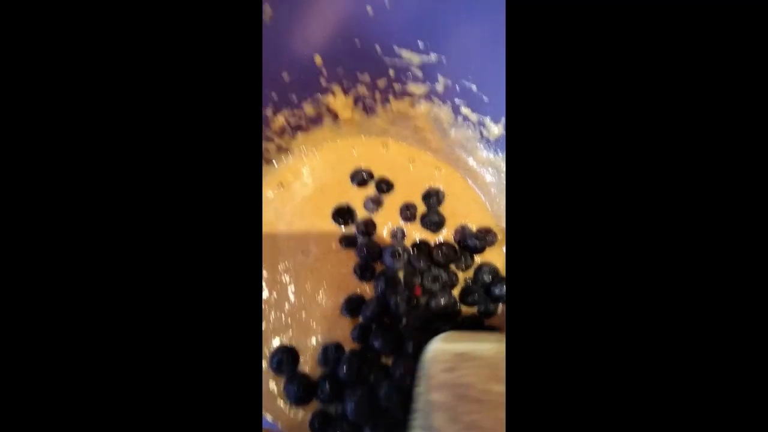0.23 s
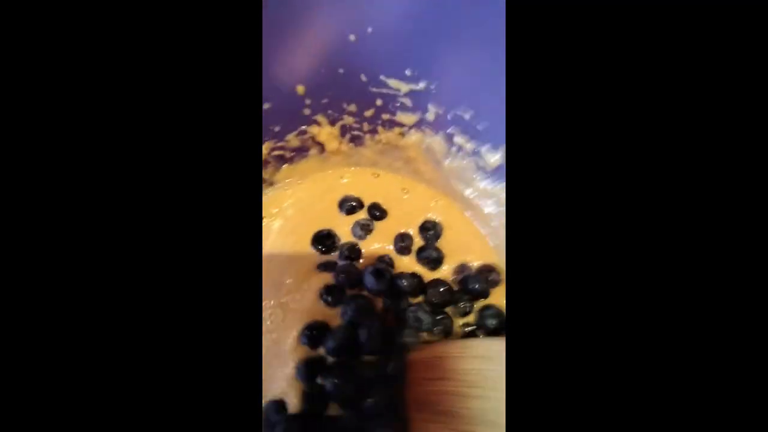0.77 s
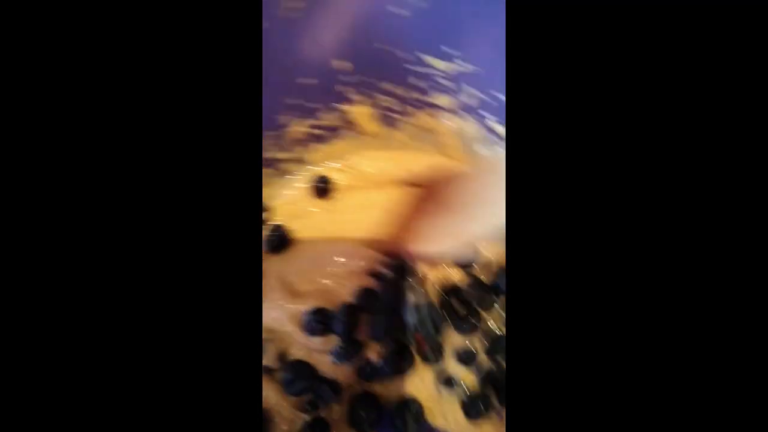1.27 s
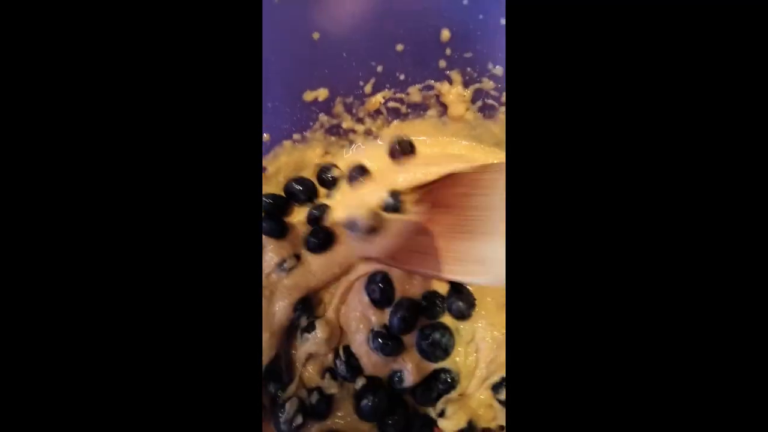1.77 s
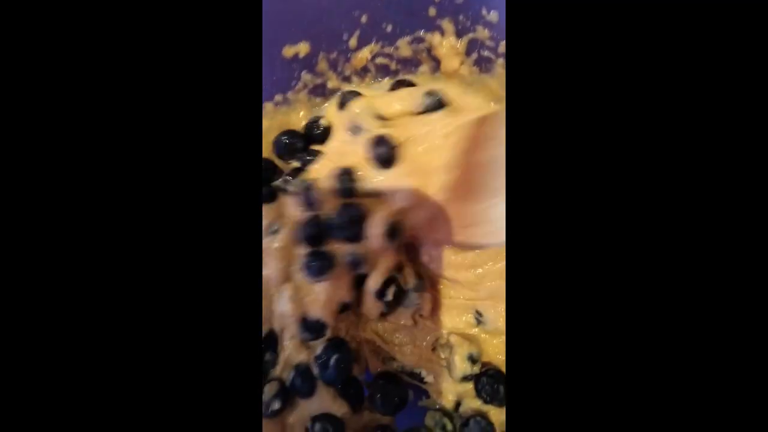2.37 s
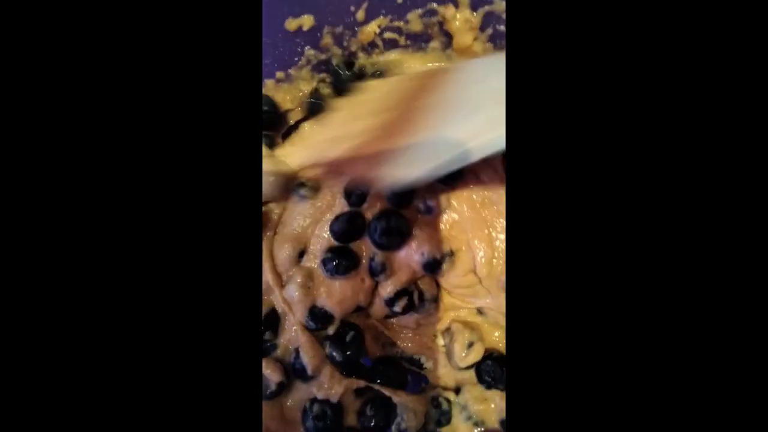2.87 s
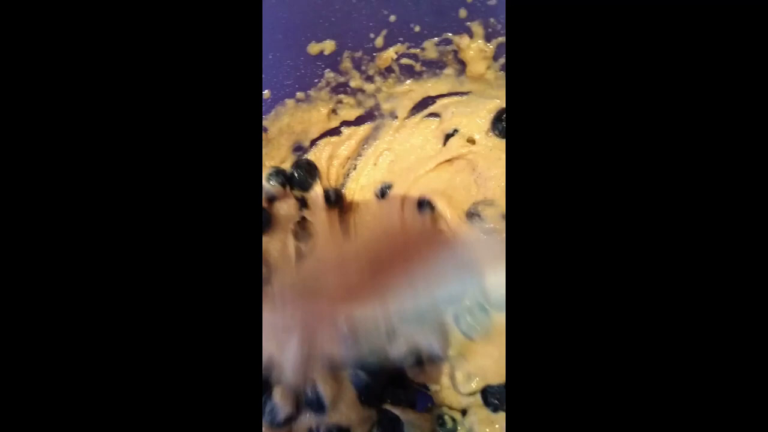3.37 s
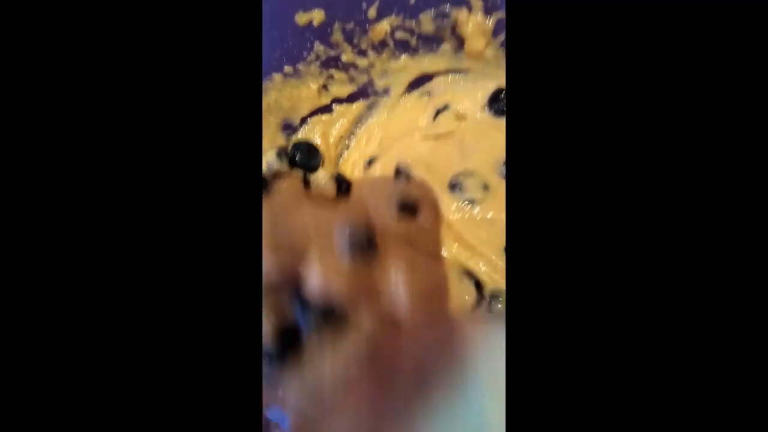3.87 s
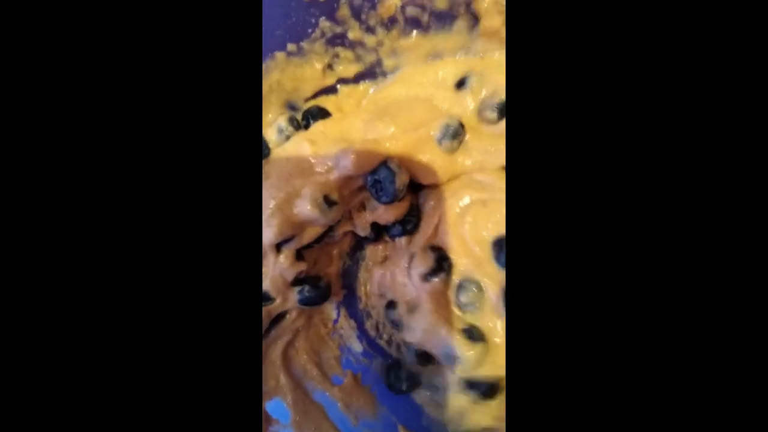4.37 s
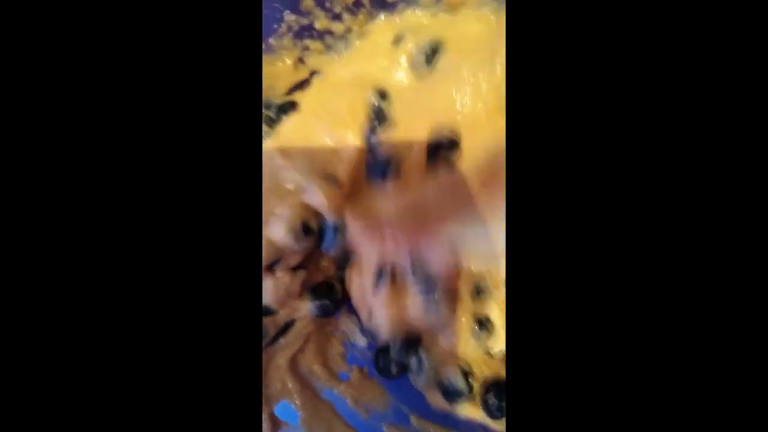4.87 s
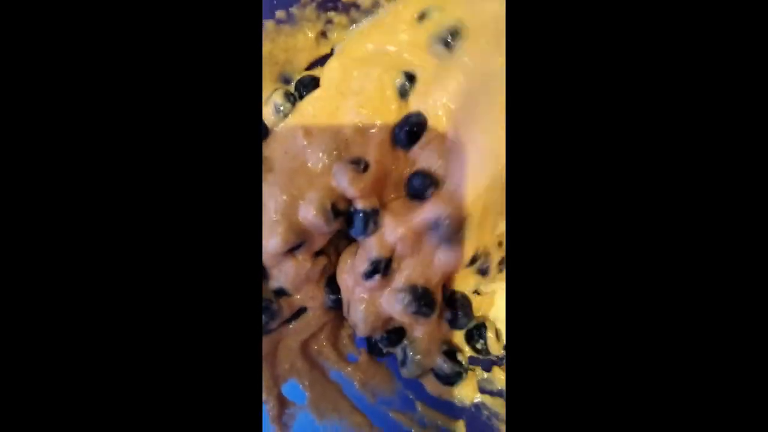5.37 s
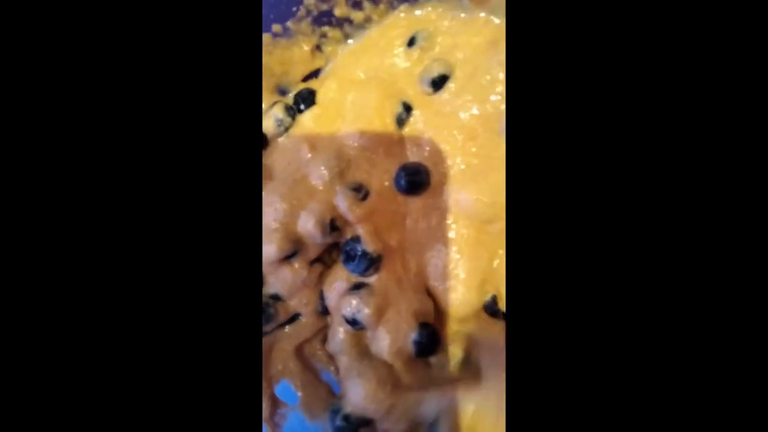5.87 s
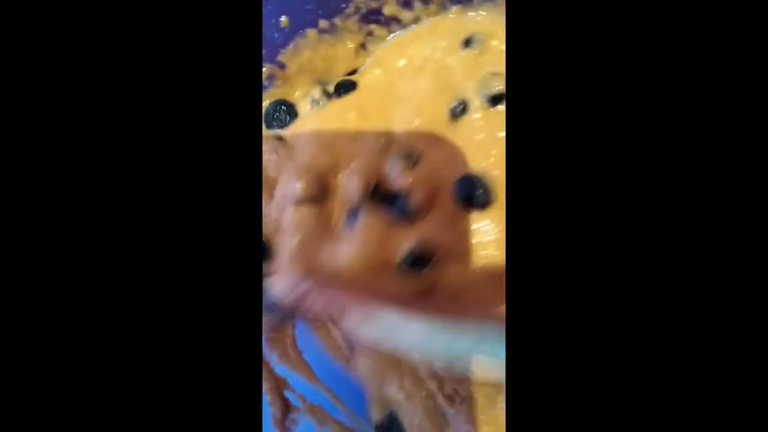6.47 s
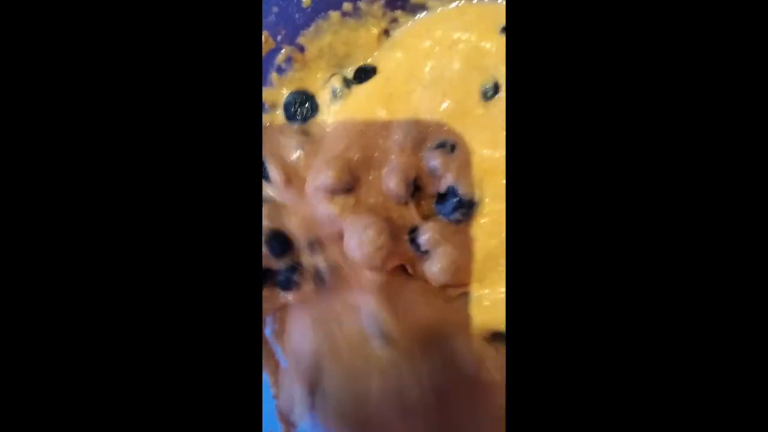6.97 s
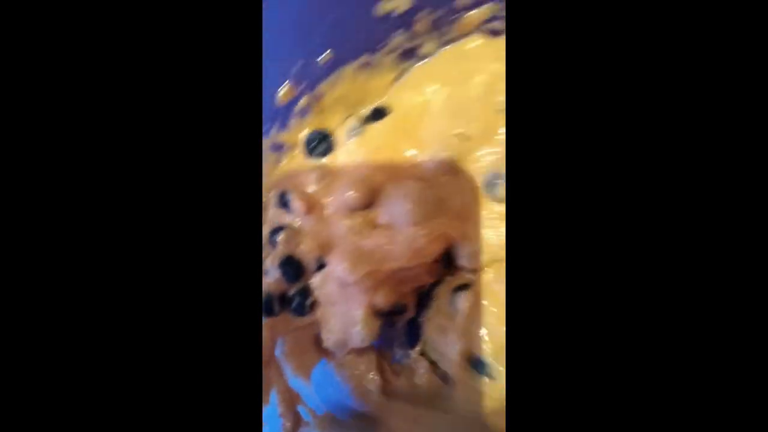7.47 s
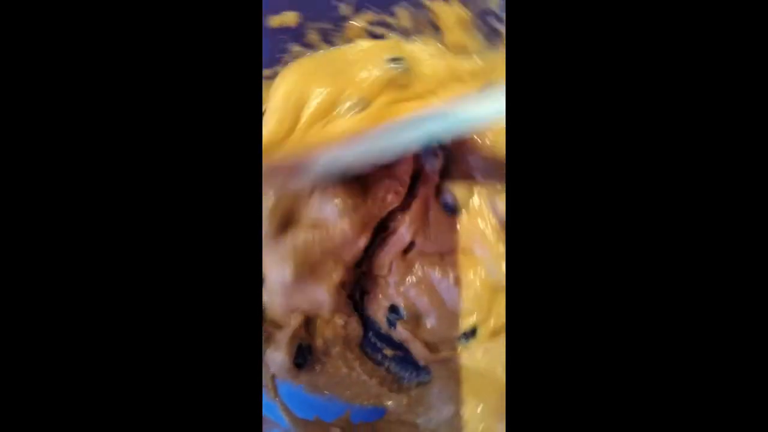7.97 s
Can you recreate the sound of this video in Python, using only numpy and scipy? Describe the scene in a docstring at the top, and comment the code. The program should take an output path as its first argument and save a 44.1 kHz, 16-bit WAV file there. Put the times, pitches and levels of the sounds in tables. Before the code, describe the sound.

Over the faint low hum of a small kitchen, a spatula starts working thick batter around a plastic bowl. Hollow knocks, rasping scrapes and sticky squelches repeat in an irregular rhythm, with little air pockets popping. A quick rustle and a short ringing clink come near the start, and a softer clink comes later. The stirring is heard up close and continues to the end.

```python
"""A wooden-handled spatula folds berries into thick batter in a plastic bowl, close to a stereo microphone.
Most strokes open with a hollow knock; then the blade sticks and slips along the wall while bubbles tear
with a squelch and air pockets smack. A brief rustle passes on the right, and twice something hard chatters
on the rim and rings. A low hum fills the small kitchen; a noise suppressor dulls the faintest treble."""
import sys
import numpy as np
from scipy import signal
from scipy.fft import rfft, irfft
from scipy.io import wavfile
from scipy.ndimage import uniform_filter1d

SR = 44100
rng = np.random.default_rng(int(sys.argv[2]) if len(sys.argv) > 2 else 0)


def to_wav(s):
    """Save 16-bit WAV."""
    ch = np.atleast_2d(s).T  # columns
    pcm = np.round(np.clip(ch, -1, 1) * 32767)  # PCM
    wavfile.write(sys.argv[1], SR, pcm.astype(np.int16))


N = 362502


def amp(db):
    return 10 ** (np.asarray(db) / 20)


def unit(x):
    return x / np.sqrt(np.mean(x ** 2) + 1e-20)


def read(points, hz):
    """A curve's value at hz, on a log frequency axis."""
    f, value = np.transpose(points)
    return np.interp(np.log(hz + 1), np.log(f + 1), value)


def add(mix, s, sound):
    part = mix[:, round(s * SR):][:, :sound.shape[1]]
    part += sound[:, :part.shape[1]]


def pan(pan_db):
    """Stereo gains; pan is left minus right level."""
    return amp(np.array([[pan_db / 2], [-pan_db / 2]]))


def colour(x, points, size=2048):
    """Causal EQ, so that clicks keep their sharp fronts."""
    log_gain = np.log(amp(read(points, abs(np.fft.fftfreq(size, 1 / SR)))))
    taps = np.fft.ifft(np.exp(np.conj(signal.hilbert(log_gain)))).real[:size // 2]
    return signal.oaconvolve(x, taps[None], axes=1)[:, :x.shape[1]]


def resonate(x, hz, width):
    """Two band-passes in a row: a resonance with steep skirts."""
    b, a = signal.iirpeak(hz, hz / width, SR)
    return signal.lfilter(b, a, signal.lfilter(b, a, x))


def wander(rate, n=N):
    """Smooth random modulation of rms 1 that changes about rate times a second."""
    hz = np.fft.rfftfreq(n, 1 / SR)
    return unit(irfft(rfft(rng.standard_normal(n)) / (1 + (hz / rate) ** 4), n))


def grains(per_s, spread_db):
    """Random tiny clicks, mostly small and a few large; rms 1."""
    size = amp(spread_db * np.minimum(rng.exponential(1, N), 5))
    return unit(size * rng.choice([-1, 1], N) * (rng.random(N) < per_s / SR))


def mode(t, hz, swell_ms):
    """A heavily damped mode that swells for swell_ms and dies within a few cycles."""
    swell = np.maximum(t, 0) * 1000 / swell_ms
    return swell * np.exp(1 - swell) * np.sin(2 * np.pi * hz * t)


# Stereo image of the stirring: f/Hz, pan/dB
STIR_PAN = [(150, -9.5), (330, 4.5), (580, -6), (1100, -4), (1900, -8), (3000, -6.5), (6400, -2),
            (9500, -14.5), (15000, -9.5)]


def ports(x, lag_ms):
    """The right microphone port is nearer the blade and hears it first and, in most bands, louder."""
    late = np.interp(np.arange(N) - lag_ms * SR / 1000, np.arange(N), x)
    left = colour(late[None], [(hz, db / 2) for hz, db in STIR_PAN])
    right = colour(x[None], [(hz, -db / 2) for hz, db in STIR_PAN])
    return np.vstack([left, right])


def in_bowl(x, size=2048, decay_s=0.002, echo=0.65):
    """Treble bounces round the bowl by paths that keep changing as blade and batter move."""
    out, t = np.zeros((2, N)), np.arange(SR // 80) / SR
    for start in range(0, N - size, size // 2):
        taps = rng.standard_normal((2, len(t))) * np.exp(-t / decay_s)
        taps /= np.linalg.norm(taps, axis=1, keepdims=True)
        piece = x[:, start:start + size] * signal.windows.cosine(size)
        add(out, start / SR, signal.fftconvolve(piece, taps, axes=1))
    return (x + echo * out) / np.hypot(1, echo)


# EQ of the room tone: f/Hz, gain/dB
HUM_EQ = [(20, -2), (48, -3.5), (85, -13.5), (125, -9), (190, -20), (400, -23), (700, -34.5), (1400, -47),
          (3000, -48), (15000, -58)]


def hum(level_db=-55.5, shared=0.3):
    """A bed of low, steady room noise, partly common to both ports."""
    noise = rng.standard_normal((3, N))
    stereo = shared * noise[2] + .5 * noise[:2]
    gain = amp(read(HUM_EQ, np.fft.rfftfreq(N, 1 / SR)))
    return amp(level_db) * unit(irfft(rfft(stereo) * gain, N))


# Bright, wet EQ of tearing batter: f/Hz, gain/dB
SQUELCH_EQ = [(1500, -41), (3500, 1.5), (4800, 1), (7000, 1.5), (9500, -3.5), (11500, -12), (15500, -18.5)]


def sticky_threads(level_db=-77, start_s=0.63):
    """Threads of batter keep parting with faint ticks, also between the strokes."""
    ticks = grains(per_s=350, spread_db=3.0) * amp(2.8 * wander(rate=14))
    ticks = colour(ticks[None], SQUELCH_EQ)[0] * (np.arange(N) > start_s * SR)
    return amp(level_db) * ports(unit(ticks), lag_ms=0.6)


# Sweeps of the blade, with the send to each layer:
# t/s, speeding up/s, slowing down/s, drag/dB, pressure change/dB, rasp/dB, squelch/dB
BLADE_STROKES = [(0.667, 0.064, 0.21, -59, -19, -54, -64.5), (0.86, 0.1, .06, -61, 6, -58.5, -54.5),
                 (1.03, 0.07, 0.022, -48.5, -8, -65, -65), (1.185, 0.05, 0.082, -35.5, -1.5, -49.5, -53),
                 (1.35, 0.076, 0.19, -38.5, -6, -43, -55.5), (1.58, 0.07, 0.045, -34, -1, -41, -46),
                 (1.69, 0.016, 0.13, -58, -10, -59, -58), (2.114, .06, 0.12, -49.5, -11.5, -54.5, -53),
                 (2.28, .03, .11, -52, -2.5, -50, -57), (2.67, 0.082, 0.03, -43, -0.5, -34, -45.5),
                 (2.775, .015, 0.073, -51, -2, -50.5, -52.5), (2.825, 0.14, .025, -30, -3.5, -41.5, -48.5),
                 (3.32, 0.093, 0.11, -47, -26.5, -54.5, -57.5), (3.579, 0.019, 0.017, -67, 1, -66, -58),
                 (3.744, 0.11, 0.17, -42, -11.5, -49, -50.5), (3.939, 0.086, 0.26, -58, -13, -56.5, -58.5),
                 (4.185, 0.011, 0.013, -58, -0.5, -71, -75), (4.305, .035, .015, -68, 0, -69.5, -69),
                 (4.35, 0.088, 0.012, -56.5, 14.5, -55.5, -56), (4.53, 0.016, .11, -45, -0.5, -49.5, -58),
                 (5.16, 0.091, 0.025, -36.5, 4, -32.5, -47), (5.28, 0.023, 0.073, -49, -10, -48, -56),
                 (5.465, .075, 0.021, -30, -1.5, -40, -50.5), (5.60, 0.088, 0.051, -43, 10, -37, -47),
                 (5.74, 0.055, 0.015, -52.5, -6, -54.5, -57), (6.059, 0.043, 0.045, -39, -14, -49, -53),
                 (6.185, 0.11, 0.15, -36.5, -8, -38.5, -49), (6.44, 0.084, 0.022, -49, 6, -56, -54.5),
                 (6.65, 0.03, .02, -63, -0.5, -65.5, -70), (6.715, 0.072, 0.035, -51, 12, -63, -59.5),
                 (6.90, 0.15, 0.052, -38, -13.5, -49.5, -50), (7.09, .08, .05, -60.5, -3.5, -61, -58),
                 (7.385, 0.11, .01, -56.5, -1, -64, -63.5), (7.47, 0.099, 0.074, -41.5, 1.5, -47.5, -49.5),
                 (7.65, 0.063, 0.023, -56, 1.5, -57, -61.5), (7.884, 0.15, 0.063, -28, -12.5, -39, -45.5),
                 (8.17, 0.066, 0.048, -47, 9, -60.5, -58.5)]
# The bowl shifts on the counter between strokes: peak t/s, half length/s, level/dB
BOWL_SHIFTS = [(2.462, 0.054, -52), (3.295, 0.011, -42), (4.698, .05, -53), (4.992, 0.044, -63),
               (7.36, 0.11, -51)]


def stroke_envelopes(bite_db_per_s=750.5, tear_s=0.01, lift_db_per_s=800, drag_lift_db_per_s=519):
    """Gains of drag, rasp and squelch: the blade bites in, speeds up, slows down and lifts clear."""
    time = np.arange(0, N, 32) / SR
    power = np.zeros((3, len(time)))
    for start, rise, fall, drag_db, press_db, rasp_db, squelch_db in BLADE_STROKES:
        t, length = time - start, rise + fall
        slowness = np.interp(t, [0, rise, length], [1, 0, 1]) ** 1.1
        arch = -slowness * max(10 + 0.62 * (rasp_db + 50.5), 0)  # brisker strokes swell more
        after = np.maximum(t - length, 0)
        pressure = press_db * (np.clip(t / length, 0, 1) - .5)
        pressure -= bite_db_per_s * np.maximum(-t, 0) + drag_lift_db_per_s * after
        tearing = -bite_db_per_s * np.maximum(tear_s - t, 0) - lift_db_per_s * after
        power[0] += amp(drag_db + 0.56 * arch + pressure) ** 2
        power[1] += amp(rasp_db + arch + tearing) ** 2
        power[2] += amp(squelch_db + 0.7 * arch + tearing) ** 2
    for s, half_s, db in BOWL_SHIFTS:
        power[0] += (amp(db) * np.exp(-((time - s) / half_s) ** 2)) ** 2
    power[0] += amp(-69) ** 2 * (time > BLADE_STROKES[0][0])  # the blade never rests quite still
    return [np.interp(np.arange(N) / SR, time, np.sqrt(p)) for p in power]


# Body resonances of the loaded bowl: f/Hz, width/Hz, gain/dB
BOWL_MODES = [(64.5, 43, -16), (177.5, 89, -7), (387.5, 58, -7), (486, 242, 3), (600, 130, -1),
              (1116, 21, -19.5)]
# EQ of the blade's rasp: f/Hz, gain/dB
RASP_EQ = [(600, -35.5), (1000, -0.5), (1400, -11), (1900, 3), (2250, -2.5), (2650, 1), (3500, 2.5),
           (4500, -15), (6000, -11.5), (9000, -52.5)]


def scraping(rasp_db=-4.5, squelch_db=-2, wall_db=-13, judder_db=3.0, clump_db=1.5, patch_db=2.0):
    """The blade sticks and slips along the wall, shaking the bowl and tearing countless small bubbles."""
    drag, rasp, squelch = stroke_envelopes()
    judder = unit(amp(judder_db * wander(rate=100)))
    slips = grains(per_s=3200, spread_db=1.04) * judder
    bowl = unit(sum(amp(db) * resonate(slips, hz, width) for hz, width, db in BOWL_MODES))
    grit = grains(per_s=5300, spread_db=3.0) * judder
    blade = unit(colour(grit[None], RASP_EQ)[0])
    wall = amp(wall_db) * unit(resonate(slips, hz=1100, width=240))
    bubbles = grains(per_s=10000, spread_db=4.5)
    bubbles *= amp(clump_db * wander(rate=110) + patch_db * wander(rate=22))
    batter = unit(colour(bubbles[None], SQUELCH_EQ)[0])
    hiss = ports(amp(rasp_db) * rasp * blade + amp(squelch_db) * squelch * batter, lag_ms=.45)
    body = ports(drag * bowl + np.sqrt(drag * rasp) * wall, lag_ms=0.61)
    return body + in_bowl(hiss)


# Blade hits on the bowl, with a trim for each layer:
# t/s, level/dB, f/Hz, thump/dB, wall overtone/dB, crack/dB, pan/dB
BOWL_HITS = [(0.6689, -32, 503, 1.5, -10, -3, 6), (1.019, -36.5, 467, 3, -29, -11, 1.5),
             (1.1116, -29, 507, -7.5, -26, -20, -6), (1.163, -8, 566, -20.5, -17, -36, -5.5),
             (1.376, -34.5, 620, -25.5, 2, 0.5, -1), (1.571, -10, 580, -10.5, -17, -9, 6.5),
             (1.634, -22, 545, -15, -5, 4.5, 0), (2.1297, -26.5, 373, -1, -41, -24.5, -10.5),
             (2.3952, -20, 488, -25.5, -33, -24, 0), (2.6727, -5.5, 510, -14.5, -23.5, -14.5, 2),
             (2.694, -29.5, 532, -9, -20.5, -12, -0.5), (2.786, -43, 402, 6, -21, -21, 0),
             (2.8323, -9, 543, -14, -20, -34.5, -7), (3.3016, -3, 541, -20.5, -13, -26.5, -0.5),
             (3.7644, -17, 555, -10.5, -28.5, -17.5, 7.5), (3.8365, -22.5, 580, -23, -25, -17, 7),
             (3.8798, -26.5, 437, -12, -22, -19, 0), (4.116, -25.5, 472, -17.5, -26, -14, -1.5),
             (4.364, -44.5, 430, 0, -18, -17.5, -8), (4.4473, -34, 390, 1, -24.5, -17, -1),
             (4.876, -45, 397, -7.5, -13.5, -18, -1.5), (5.1537, -21, 605, -4.5, -14, -12, -14),
             (5.268, -44, 446, 7, -11.5, -1, 4), (5.4543, -10.5, 533, -23.5, -26.5, -36, -4),
             (5.5882, -38.5, 305, 1.5, -31, -43, -9), (6.058, -13, 562, -24.5, -18, -34.5, -6.5),
             (6.2362, -35, 550, -26, 5, 2.5, -3), (6.2981, -27.5, 557, -13, -7, -2, 6),
             (6.7633, -19, 452, -17.5, -12.5, -16.5, -8.5), (6.8965, -8, 579, -16.5, -21, -25, -7.5),
             (7.4757, -17.5, 523, -12.5, -16.5, -18, -10), (7.868, -2.5, 544, -20.5, -11, -25, -2)]
# EQ of the woody attack: f/Hz, gain/dB
CRACK_EQ = [(500, -30), (1000, 0), (1400, -10.5), (1900, -0.5), (2700, -1), (4000, -11.5), (6000, -18.5),
            (10000, -28.5), (15000, -50)]


def knocks(lead_s=0.00065, push_s=0.00054, crack_s=0.0059, thump_hz=178, counter_hz=70):
    """Batter damps the bowl: a blow is a short hollow note, a thump into the counter and a woody crack."""
    out, time = np.zeros((2, N)), np.arange(SR // 8) / SR
    push = np.exp(-((time[:SR // 200] - push_s) / (push_s / 3)) ** 2)  # the soft blade rounds the blow
    for s, db, hz, thump_db, wall_db, crack_db, pan_db in BOWL_HITS:
        swell_ms = 1.01 + 0.13 * max(-22 - crack_db, 0)  # cushioned by batter: less crack, longer note
        lag_ms = [[0], [0.73]] if pan_db > 0.9 else [[0.6], [0]]  # the far port hears it later
        t = time - np.array(lag_ms) / 1000
        body = mode(t, hz, swell_ms) + amp(-9) * mode(t, hz * 1.126, swell_ms=2.5)
        body += amp(wall_db + 2) * mode(t, hz=1080, swell_ms=2.9)
        base = amp(-13) * pan(9.5) * mode(t, hz=350, swell_ms=3.27)
        counter = amp(-15) * mode(t, counter_hz, swell_ms=11)
        thump = amp(thump_db) * pan(3.0) * (mode(t, thump_hz, swell_ms=4) - counter)
        note = signal.lfilter(push / push.sum(), 1, pan(pan_db) * body + base + thump)
        burst = colour(rng.standard_normal(t.shape) * np.exp(-time / crack_s), CRACK_EQ)
        crack = amp(crack_db - 7) * burst / burst[:, :SR // 200].std()
        add(out, s - lead_s, amp(db) * note)
        add(out, s, amp(db) * pan(pan_db) * crack)
    return out


def squishes(trim_db=-9.5, cavity_hz=2000, width_hz=330, spread=0.08, drift=0.023, pan_db=-9):
    """At each stroke's fastest, crackle rings a small cavity whose pitch drifts as the batter deforms."""
    out, t = np.zeros((2, N)), np.arange(-SR // 6, SR // 6) / SR
    crackle = grains(per_s=3900, spread_db=2.0)
    pole = np.exp(-np.pi * width_hz / SR)
    for start, rise, fall, _, _, rasp_db, _ in BLADE_STROKES:
        centre_hz = cavity_hz * np.exp(spread * rng.standard_normal())
        hz = centre_hz * (1 + drift * wander(rate=25, n=len(t)))
        carrier = np.exp(2j * np.pi * np.cumsum(hz) / SR)
        drive = rng.choice(crackle, (2, len(t)))
        # a band-pass that follows the pitch
        cavity = (carrier * signal.lfilter([1], np.poly([pole, pole]), drive / carrier)).real
        swell = np.exp(-(t / (0.14 * (rise + fall))) ** 2)
        add(out, start + rise + t[0], amp(rasp_db + trim_db) * pan(pan_db) * unit(cavity) * swell)
    return out


# The largest air pockets bursting: t/s, level before trim/dB, f/Hz
AIR_POCKETS = [(0.9253, -43, 5300), (1.0015, -40.5, 4750), (1.4337, -40, 6960), (1.535, -42, 4090),
               (1.971, -57.5, 3080), (2.318, -38, 8800), (2.468, -58.5, 6000), (2.8815, -42, 2620),
               (3.0252, -53.5, 6980), (3.258, -62.5, 2540), (3.376, -44.5, 2480), (3.5065, -37.5, 7357),
               (4.192, -59, 6770), (4.4427, -38.5, 3460), (4.5396, -42.5, 2200), (4.8016, -60.5, 2620),
               (4.8854, -50.5, 5280), (5.8896, -59.5, 3160), (6.3614, -33, 4230), (6.3985, -37.5, 3800),
               (6.4597, -45.5, 3424), (7.095, -39, 4600), (7.1383, -46, 8800), (7.1747, -46, 9040),
               (7.3966, -53.5, 9200), (7.5457, -40, 2680)]


def smacks(trim_db=5.0, decay_s=0.0029, pan_db=-6.5):
    """An air pocket tears open with a short wet snap."""
    out, t = np.zeros((2, N)), np.arange(SR // 30) / SR
    for s, db, hz in AIR_POCKETS:
        burst = rng.standard_normal((2, len(t))) * np.exp(-t / decay_s)
        snap = resonate(burst, hz, width=hz)
        add(out, s, amp(db + trim_db) * pan(pan_db) * snap / abs(snap).max())
    return out


def brush(s=1.074, width_s=0.0064, level_db=-25, left_db=-26):
    """A brief rustle against the right port, as of a finger brushing past."""
    swell = np.exp(-abs(np.arange(N) / SR - s) / width_s)
    crackle = grains(per_s=9000, spread_db=2)
    eq = [(60, -2.0), (400, -4.5), (1300, -3.5), (3000, -11), (8000, -24.5), (11000, -18), (15000, -43)]
    return amp(level_db) * amp([[left_db], [0]]) * swell * unit(colour(crackle[None], eq))


# Hard contacts on the rim: t/s, level/dB, chatter/s, squeal/0-1, pitch/ratio, tick trim/dB
RIM_HITS = [(1.6326, -20.5, .044, 0.8, 1.0007, -10), (6.299, -27, 0.021, 0, 1.008, -13.5)]
# Partials of their ring: f/Hz, level/dB, t60/s, gain at full squeal/dB
RIM_PARTIALS = [(3766, -1.5, 0.048, -3.5), (3980, -16, 0.25, 0), (5300, -14.5, 0.09, 21),
                (6580, -17, 0.126, 3.5), (7070, -7.5, 0.115, 12), (8534, -9, 0.056, -2.5),
                (9800, -26, 0.27, 3), (10672, -37, 0.18, 14.5), (12650, -38.5, 0.18, 10.5),
                (14290, -32.5, .1, 14.5)]


def clinks(sag_db_per_s=90, waver_db=4.5, attack_s=0.0008, tick_s=0.0018, right_db=-15):
    """The ring sustains while the contact chatters on the rim, and dies quickly once it is let go."""
    out, t = np.zeros((2, N)), np.arange(SR // 3) / SR
    attack = np.minimum(t / attack_s, 1)
    for s, db, hold, squeal, pitch, tick_db in RIM_HITS:
        ring = 0
        for hz, mode_db, t60, squeal_db in RIM_PARTIALS:
            fall_db = sag_db_per_s * np.minimum(t, hold) + 60 * np.maximum(t - hold, 0) / t60
            level = amp(mode_db + squeal * squeal_db - fall_db + waver_db * wander(rate=110, n=len(t)))
            ring = ring + level * np.sin(2 * np.pi * (hz * pitch * t + rng.random()))
        ring = amp(db) * ring * attack * amp([[0], [right_db]])
        chatter = amp(-15.5) / (1 + (t / hold) ** 8)
        contact = amp(tick_db + 5.0) * (np.exp(-t / tick_s) + chatter)
        add(out, s, ring + colour(rng.standard_normal((2, len(t))) * contact, CRACK_EQ))
    return out


# Reverb time of the kitchen: f/Hz, t60/s
KITCHEN_DECAY = [(100, 0.76), (500, 0.31), (2000, 0.32), (4500, 0.32), (14000, 0.045)]


def kitchen(x, predelay_s=0.0066, density=0.08):
    """Dense reflections of a small room, each band dying at its own speed."""
    n = SR // 2
    taps = rng.standard_normal((2, n)) * (rng.random((2, n)) < density)
    taps *= np.arange(n) > predelay_s * SR
    hz, t, bands = signal.stft(taps, SR, nperseg=256)
    decay = amp(-60 * t / read(KITCHEN_DECAY, hz)[:, None])
    tail = signal.istft(bands * decay, SR, nperseg=256)[1]
    return signal.fftconvolve(x, tail / np.linalg.norm(tail[0]), axes=1)[:, :N]


def scene():
    """The bowl up close, with a light send to the kitchen reverb, over the room tone."""
    blows, rim = knocks(), clinks()
    stirring = scraping() + smacks() + squishes() + in_bowl(sticky_threads())
    room = kitchen(amp(-16.5) * blows + amp(-20.5) * (stirring + rim))
    return blows + stirring + rim + room + brush() + hum()


def record(dry, split_hz=1100, threshold_db=-69, knee_db=1.5, depth_db=6, lowpass_hz=15850):
    """A noise suppressor ducks the treble when it gets faint; then a full-scale clip and a low-pass."""
    treble = signal.sosfiltfilt(signal.butter(2, split_hz, "high", fs=SR, output="sos"), dry)
    level_db = 10 * np.log10(abs(uniform_filter1d((treble ** 2).mean(0), size=260)) + 1e-14)
    shut = (1 + np.tanh((threshold_db - level_db) / knee_db)) / 2
    quieted = dry - treble * (1 - amp(-depth_db * shut))
    taps = signal.firwin(511, lowpass_hz, window=("kaiser", 9), fs=SR)
    return signal.oaconvolve(np.clip(quieted, -1, 1), taps[None], "same")


dry = scene()
out = record(dry)
to_wav(out)
```